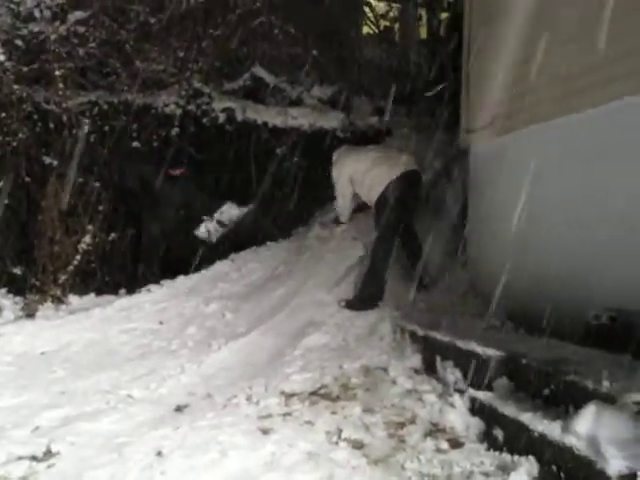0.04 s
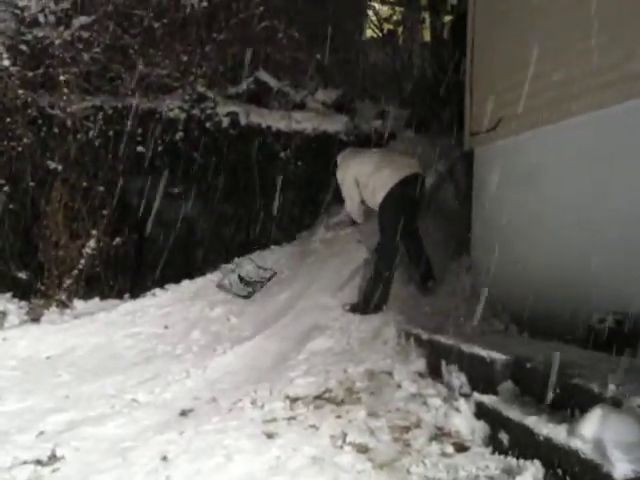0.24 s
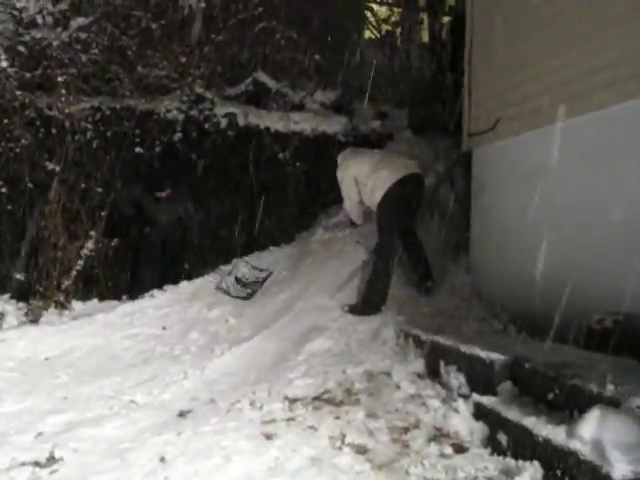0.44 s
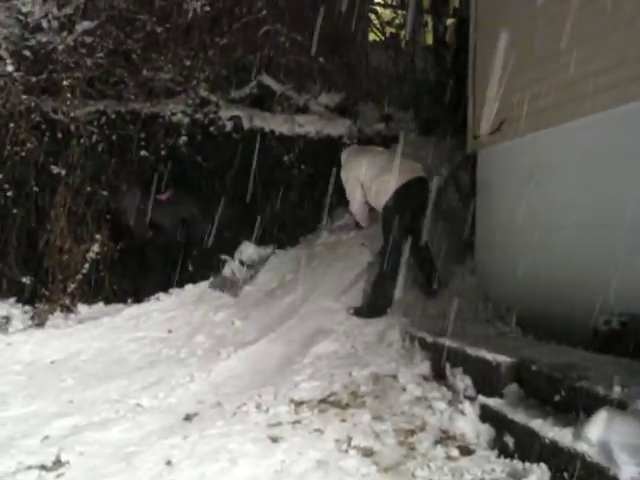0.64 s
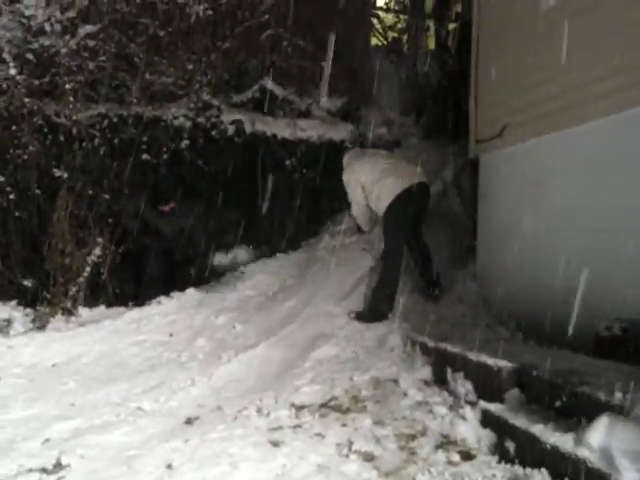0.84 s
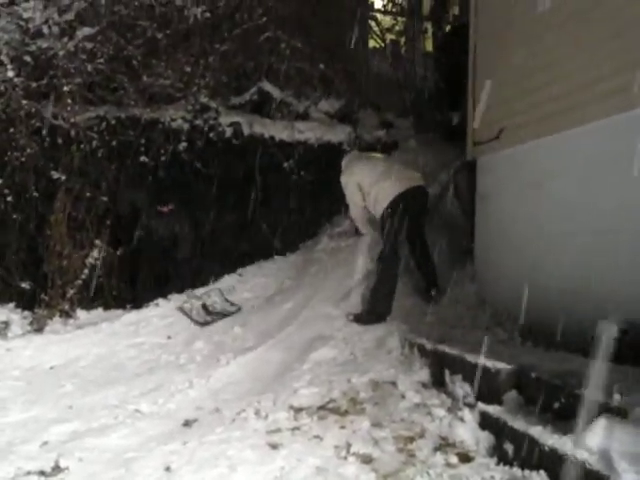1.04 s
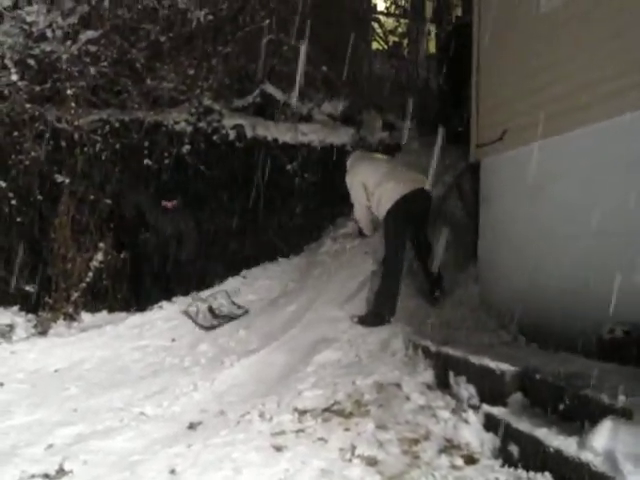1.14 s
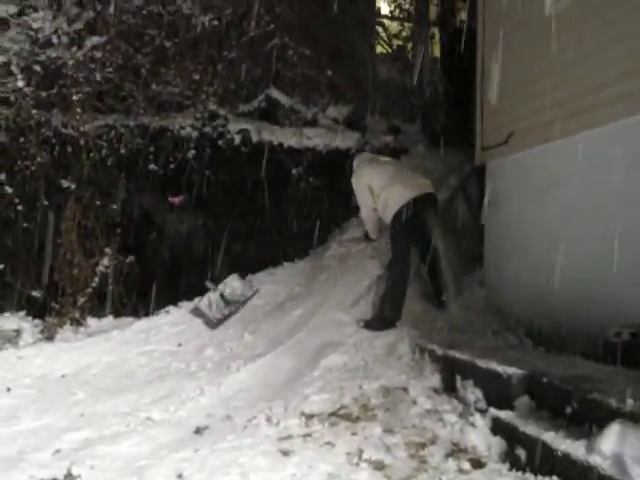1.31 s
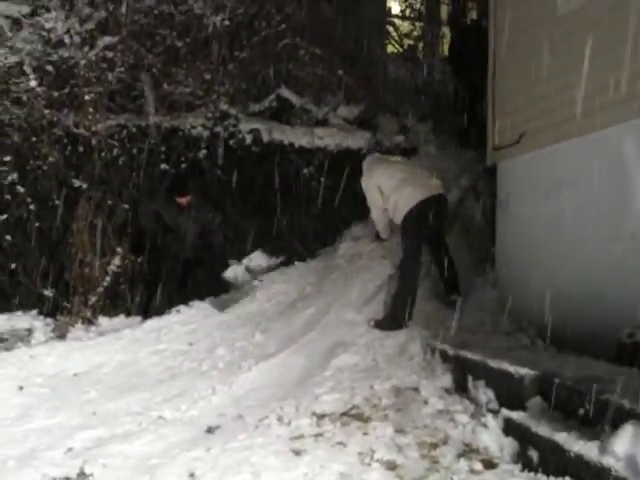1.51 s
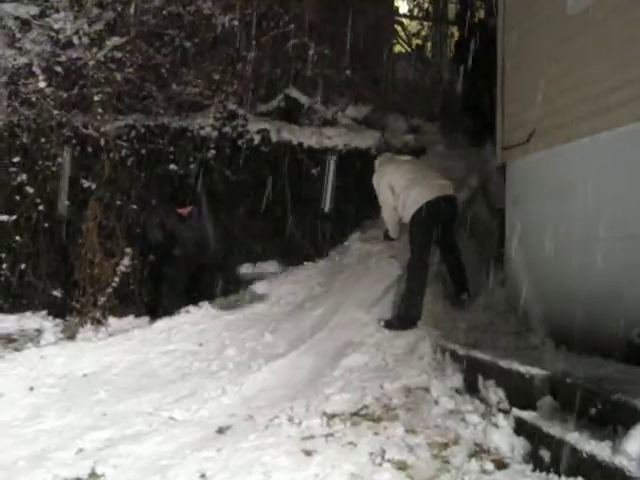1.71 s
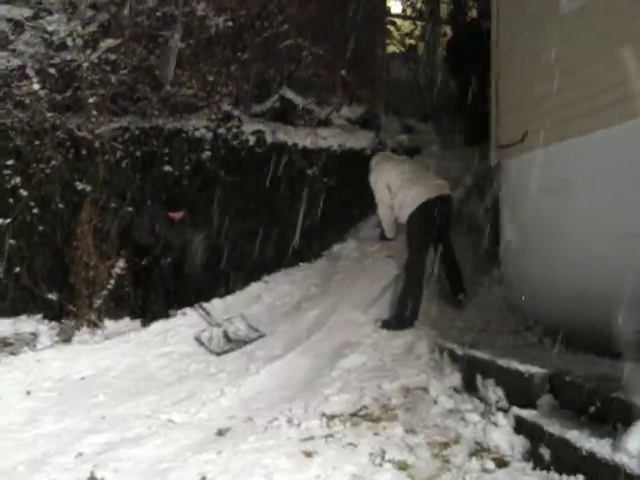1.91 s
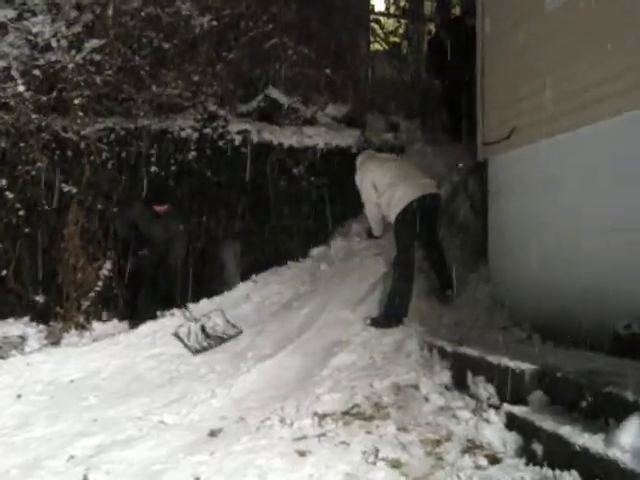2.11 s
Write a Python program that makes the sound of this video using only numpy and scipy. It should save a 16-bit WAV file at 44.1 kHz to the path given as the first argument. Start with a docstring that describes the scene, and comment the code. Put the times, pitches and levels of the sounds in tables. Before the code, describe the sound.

Gloved hands slap a heap of snow three times, at about 0.2, 0.9 and 1.8 seconds, the first the sharpest. Each slap has a crack, a hollow thump and a short crunch, with a faint echo from a house wall. Soft pats, sleeve swishes and brief fabric rasps fall around them until about 2.1 seconds. A low outdoor rumble dips after the first slap and slowly returns.

```python
"""You hear sleeves swish softly in a yard at night, then gloved hands slap a heap of snow three times.
Each slap is a crack of the glove, a hollow thump of trapped air and a short crunch of packing snow.
Soft pats and brief rasps of fabric fall around the slaps, and a house wall and the yard echo the hands.
An automatic volume control turns the sound down after loud blows and slowly brings it back."""
import sys
import numpy as np
from scipy import signal
from scipy.fft import rfft, irfft, next_fast_len
from scipy.io import wavfile
from scipy.ndimage import uniform_filter1d, map_coordinates

SR = 44100
rng = np.random.default_rng(int(sys.argv[2]) if len(sys.argv) > 2 else 0)


def persist_wave(psi):
    """Save psi, clipped to +-1, as 16-bit WAV."""
    counts = np.round(np.clip(psi, -1, 1) * 32767).astype(np.int16)
    wavfile.write(sys.argv[1], SR, np.atleast_2d(counts).T)


N = 94815
T = np.arange(N) / SR

# A fade time (t60) is how long a sound takes to drop by 60 dB.
# How loud the steady sounds are over time. Each row: time in seconds, level in dB.
NIGHT_LEVELS = [(0, -43.5), (.35, -45), (.52, -53), (.8, -51.5), (1.05, -47), (1.45, -47), (2.15, -44.5)]
SWISH_LEVELS = [(0, -52), (.12, -47.5), (.175, -50), (.23, -44.5), (.28, -50), (.32, -56.5), (.5, -59),
                (.65, -60.5), (.8, -58), (.92, -50), (1.05, -54.5), (1.125, -56), (1.17, -52.5),
                (1.29, -59), (1.45, -51.5), (1.56, -50), (1.61, -48.5), (1.66, -55.5), (1.94, -49.5),
                (2.03, -41.5), (2.15, -51.5)]
# The tone of each sound, from bass to treble. Each row: frequency in Hz, level in dB.
NIGHT_TONE = [(20, 1.5), (60, 1.5), (130, -8), (300, -12.5), (600, -15), (1500, -21), (4000, -36.5),
              (10000, -33.5), (15500, -55)]
SWISH_TONE = [(100, -12), (600, -0.5), (1400, -2.5), (3000, 2), (5000, -1.5), (10000, -7.5), (13000, -13),
              (15500, -20)]
CRUMBLE_TONE = [(300, -29), (1000, -0.5), (2500, 0), (5000, -10), (8000, -8.5), (11000, -14.5),
                (15800, -28)]  # loose surface snow
RASP_TONE = [(2000, -38), (6000, -2), (11000, -6), (13000, -10), (15800, -12.5)]
CRACK_TONE = [(200, -23.5), (900, 0.5), (2000, -1), (3300, -11), (4500, -9), (6000, -12.5), (8000, -20),
              (11000, -17), (13500, -27), (15800, -40)]
CRUNCH_TONE = [(150, -13.5), (500, 9), (1200, 1.5), (1750, 2), (2300, 2), (3200, -3.5), (5000, -6.5),
               (7500, -12.5), (10500, -15.5), (13500, -32), (15800, -46)]  # snow being packed
THUD_TONE = [(25, -7), (60, -8), (110, -7), (190, -0.5), (330, 2.5), (430, -7.5), (560, -8.5), (900, -19),
             (1500, -51.5), (4000, -47.5)]
# Light pats on the snow. Each row: start in seconds, thud level in dB, thud pitch in Hz,
# thud fade in seconds, crumble level in dB, crumble fade in seconds.
PATS = [(.005, -37.5, 125, 0.18, -56, 0.046), (0.183, -44, 970, 0.034, -36.5, 0.023),
        (.1975, -28.5, 1320, 0.019, -41, 0.027), (0.2951, -36.5, 131, 0.18, -36, 0.037),
        (.951, -22, 550, 0.063, -32, .014), (1.065, -34.5, 107, 0.075, -48, 0.12),
        (1.233, -37, 197, 0.09, -62, 0.041), (1.325, -42.5, 230, 0.051, -59, 0.054),
        (1.588, -34.5, 190, 0.034, -56, 0.044), (1.758, -40, 223, 0.064, -67, .05),
        (1.827, -25.5, 460, 0.12, -32.5, 0.045), (1.853, -33.5, 1520, 0.044, -41, 0.032),
        (1.892, -27, 99, 0.096, -40, 0.056), (1.947, -31.5, 203, 0.082, -46.5, 0.086),
        (2.131, -22.5, 246, 0.038, -44, 0.06)]
# Skids of a sleeve or glove. Each row: peak time in seconds, level in dB, rise and fade in seconds.
RASP_EVENTS = [(.232, -45, 0.035, 0.09), (1.002, -49.5, .01, 0.029), (1.61, -49.5, .03, .1),
               (1.743, -52, 0.00072, 0.0135)]
# The three slaps. Each row: start in seconds, crack level in dB, crack rise and fade in seconds,
# crack treble tilt in dB per octave, glove snap level in dB, crunch level in dB,
# crunch fade in seconds, thud level in dB, thud fade in seconds.
SLAP_EVENTS = [(0.2386, -12, 0.00053, 0.014, -1.7, -7, -26.5, 0.12, -13.5, 0.092),
               (0.9362, -18.5, 0.0034, 0.062, -1.8, -22, -24, 0.18, -12, .15),
               (1.828, -19, 0.01, 0.019, 0.45, -43, -25, 0.13, -16.5, 0.15)]
# Air squeezed under the palms. Each row: start in seconds, level in dB, pitch in Hz,
# rise and fade in seconds.
AIR_POCKETS = [(0.2399, 2, 181.4, 0.0036, 0.023), (0.2452, -18.5, 368, 0.009, 0.061),
               (0.9357, -7, 199, 0.0011, 0.094), (.941, -29, 552, 0.0032, 0.085),
               (1.8311, -7, 347.6, 0.0082, 0.042), (1.8337, -9.5, 108.6, 0.0082, 0.044),
               (1.836, -19.5, 160, 0.0023, 0.058)]
# How long the yard rings. Each row: frequency in Hz, fade in seconds.
YARD_FADES = [(100, 0.35), (300, 0.58), (800, 0.25), (3000, 0.18), (12000, 0.12)]

GRAINS_PER_S, GRAIN_SPREAD_DB = 12000, -0.5
THUD_RISE_S, PAT_Q = 0.0029, 2.26  # a higher Q gives a pat a clearer pitch
SNAP_HZ, SNAP_FADE_S = 3264, 0.0036
YARD_DB, WALL_DB, WALL_DELAY_S, WALL_CUTOFF_HZ = -22, -14, 0.0205, 900
DUCK_ABOVE_DB, DUCK_SHARE, RECOVER_DB_PER_S = -13.5, 0.64, 13.5  # to duck is to turn down
CEILING, TOP_HZ = 0.74, 15900


def amp(db):
    """Turn decibels into a number to multiply by."""
    return 10 ** (np.asarray(db) / 20)


def unit(x):
    """Scale x to an average strength (rms) of 1."""
    return x / np.sqrt(np.mean(x ** 2) + 1e-20)


def along(points, hz):
    """Read between the rows of a frequency table, with octaves evenly spaced."""
    freqs, values = np.transpose(points)
    return np.interp(np.log(hz + 1), np.log(freqs + 1), values)


def filtered(x, response):
    """Multiply each frequency in x by response(hz)."""
    size = next_fast_len(N + SR // 2)
    return irfft(rfft(x, size) * response(np.fft.rfftfreq(size, 1 / SR)), size)[:N]


def coloured(x, tone):
    """Shape x with a tone table, at strength 1."""
    return unit(filtered(x, lambda hz: amp(along(tone, hz))))


def wobble(rate):
    """A smooth curve through `rate` random points a second."""
    return map_coordinates(rng.standard_normal(int(N * rate / SR) + 4), [T * rate])


def grains():
    """Many tiny breaks, each a click of a different size."""
    clicks = (rng.random(N) < GRAINS_PER_S / SR) * rng.standard_normal(N)
    return clicks * amp(GRAIN_SPREAD_DB * rng.standard_normal(N))


def envelope(start, rise, fade):
    """A loudness shape that climbs in a straight line, then dies away."""
    return np.clip((T - start) / rise, 0, 1) * amp(-60 * np.maximum(T - start - rise, 0) / fade)


def burst(x, start, rise, fade):
    """Cut a short burst from x, with as much energy as its loudness shape."""
    shape = envelope(start, rise, fade)
    return unit(x * shape) * np.sqrt(np.mean(shape ** 2))


def night():
    """A low outdoor rumble lies under everything."""
    level_db = np.interp(T, *np.transpose(NIGHT_LEVELS))
    return amp(level_db) * coloured(rng.standard_normal(N), NIGHT_TONE)


def swish(flutter_db=1.0, grit=0.5):
    """Cloth and gloves slide over loose snow with a gritty hiss."""
    level_db = np.interp(T, *np.transpose(SWISH_LEVELS)) + flutter_db * wobble(rate=40.46)
    hiss = rng.standard_normal(N) + grit * unit(grains())
    return amp(level_db) * coloured(hiss, SWISH_TONE)


def pats():
    """A hand lands softly: a small round thud and crumbling snow, with no crack."""
    out = np.zeros(N)
    for start, thud_db, pitch, thud_fade, crumble_db, crumble_fade in PATS:
        def hollow(hz):
            """Favour the sound near the pitch and soften the treble."""
            resonance = 1j * hz / (pitch ** 2 - hz ** 2 + 1j * hz * pitch / PAT_Q)
            return resonance / (1 + 0.5j * hz / pitch)
        body = unit(filtered(rng.standard_normal(N), hollow))
        out += amp(thud_db) * burst(body, start, THUD_RISE_S, thud_fade)
        out += amp(crumble_db) * crunch(start, rise=0.0021, fade=crumble_fade, tone=CRUMBLE_TONE)
    return out


def crunch(start, rise, fade, tone, clump_db=2):
    """Snow crystals break in clumps as they are pressed together."""
    clumps = coloured(grains(), tone) * amp(clump_db * wobble(rate=250))
    return burst(clumps, start, rise, fade)


def rasps():
    """Fabric skids briefly with a thin, high scratch."""
    return sum(amp(db) * burst(coloured(grains(), RASP_TONE), peak - rise, rise, fade)
               for peak, db, rise, fade in RASP_EVENTS)


def slaps():
    """The glove cracks and snaps on the surface, then the snow crunches and gives."""
    out = np.zeros(N)
    for (start, crack_db, rise, crack_fade, tilt_db, snap_db,
         crunch_db, crunch_fade, thud_db, thud_fade) in SLAP_EVENTS:
        out += amp(crack_db) * crack(start, rise, crack_fade, tilt_db)
        out += amp(snap_db) * envelope(start, rise, SNAP_FADE_S) * np.sin(2 * np.pi * SNAP_HZ * (T - start))
        press = start + rise / 2
        out += amp(crunch_db) * crunch(press, rise / 2, crunch_fade, CRUNCH_TONE)
        out += amp(thud_db) * thud(press, thud_fade)
    return out


def crack(start, rise, fade, tilt_db):
    """The glove meets the snow: sharp when it lands flat, slower when it rolls on."""
    lowest_hz = CRACK_TONE[0][0]
    noise = filtered(rng.standard_normal(N),
                     lambda hz: amp(along(CRACK_TONE, hz) + tilt_db * np.log2(1 + hz / lowest_hz)))
    contact = np.clip((T - start) / rise, 0, 1)
    return burst(noise * contact, start, rise, fade)


def thud(start, fade):
    """The heap gives way with a dull sound."""
    return burst(coloured(rng.standard_normal(N), THUD_TONE), start, THUD_RISE_S, fade)


def thumps():
    """Air trapped under a palm vibrates for a moment."""
    return sum(amp(db) * envelope(start, rise, fade) * np.sin(2 * np.pi * hz * (T - start))
               for start, db, hz, rise, fade in AIR_POCKETS)


def yard(x):
    """The house wall sends back one dull echo, and the yard adds a faint wash of sound."""
    hz, seconds, spectrum = signal.stft(rng.standard_normal(SR // 2), SR, nperseg=256)
    fading = amp(-60 * seconds / along(YARD_FADES, hz)[:, None])
    tail = signal.istft(spectrum * fading, SR, nperseg=256)[1]
    wash = signal.fftconvolve(x, tail / np.linalg.norm(tail))[:N]
    wall = filtered(x, lambda f: np.exp(-2j * np.pi * f * WALL_DELAY_S) / (1 + 1j * f / WALL_CUTOFF_HZ))
    return amp(YARD_DB) * wash + amp(WALL_DB) * wall


def scene():
    """Mix the hands, their echo, the fabric and the night into one channel."""
    hands = slaps() + thumps() + pats()
    return (hands + yard(hands) + swish() + rasps() + night())[None]


def record(dry):
    """The volume drops after loud blows and creeps back; peaks are rounded and the top treble is cut."""
    x = dry[0]
    power = np.abs(uniform_filter1d(x ** 2, size=441))  # averaged over 10 ms
    level_db = 10 * np.log10(power + 1e-12)
    need_db = DUCK_SHARE * np.maximum(level_db - DUCK_ABOVE_DB, 0)
    duck_db = np.maximum.accumulate(need_db + RECOVER_DB_PER_S * T) - RECOVER_DB_PER_S * T
    glide = np.exp(-1 / (0.03 * SR))  # smooths volume changes over 30 ms
    ducked = x * amp(-signal.lfilter([1 - glide], [1, -glide], duck_db))
    rounded = ducked / (1 + np.abs(ducked / CEILING) ** 8) ** (1 / 8)
    return filtered(rounded, lambda hz: hz < TOP_HZ)[None]


dry = scene()
out = record(dry)
persist_wave(out)
```